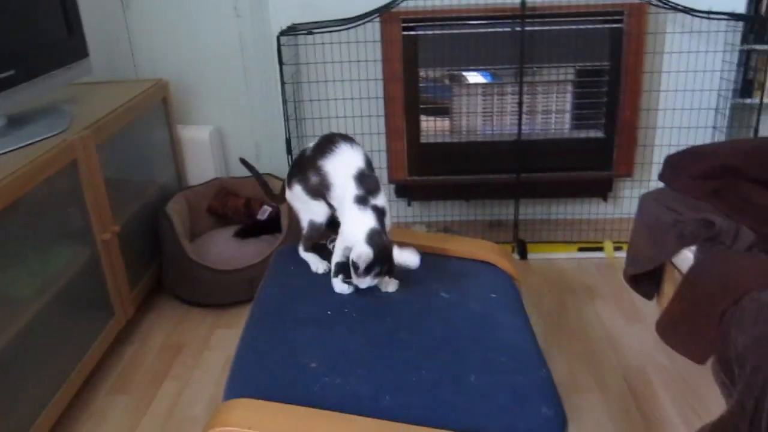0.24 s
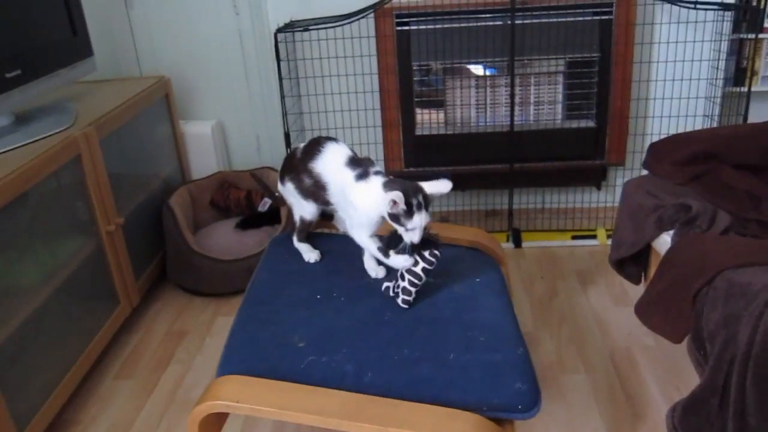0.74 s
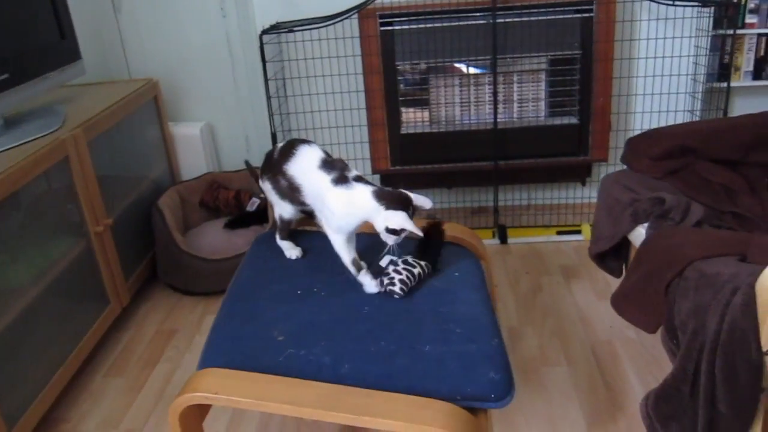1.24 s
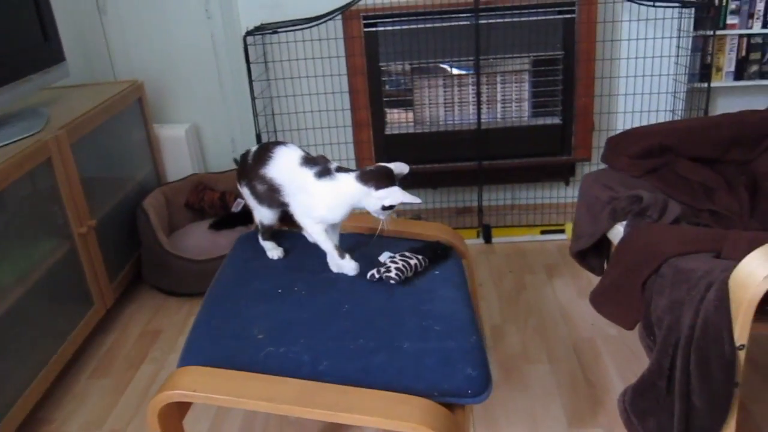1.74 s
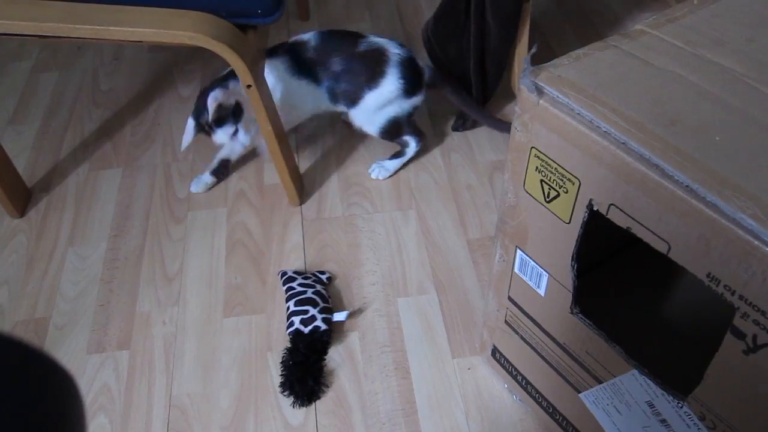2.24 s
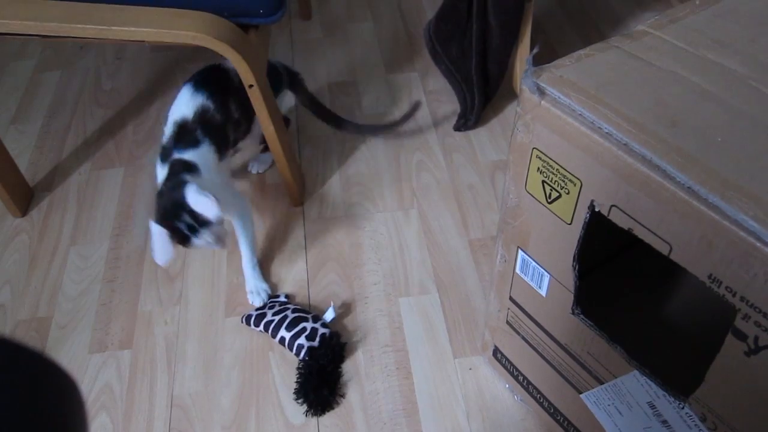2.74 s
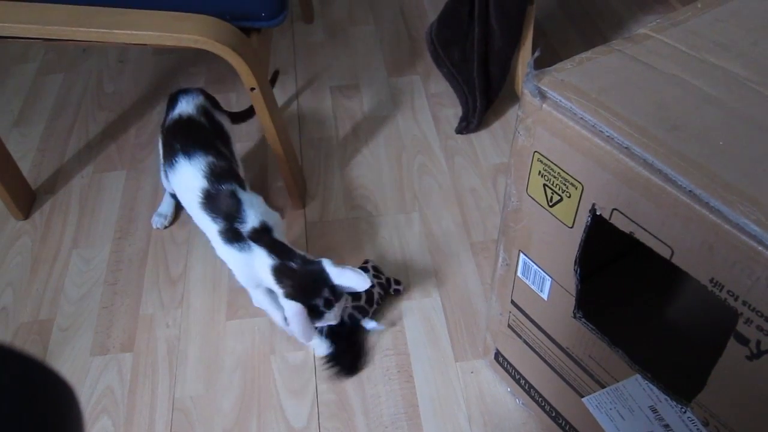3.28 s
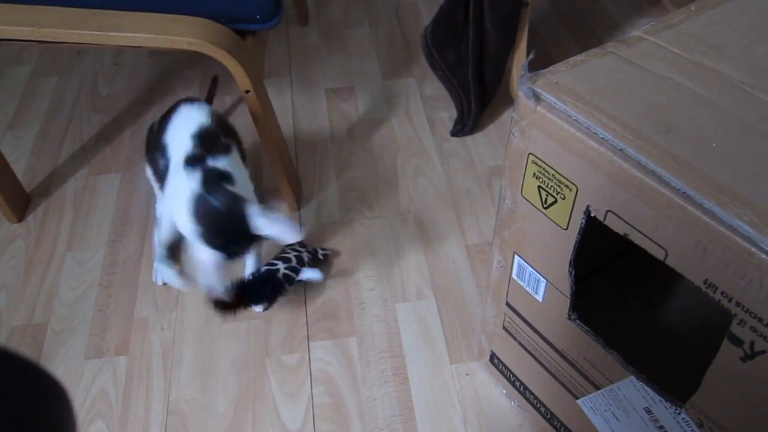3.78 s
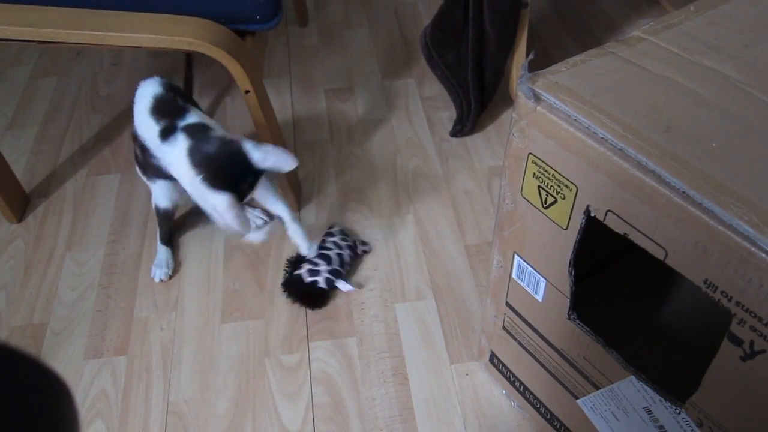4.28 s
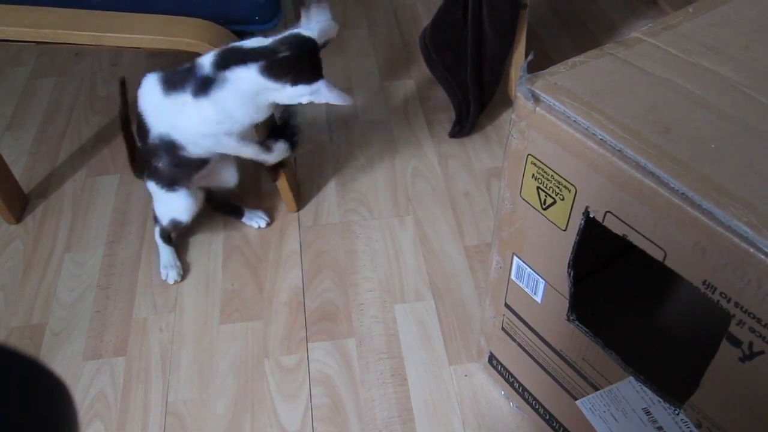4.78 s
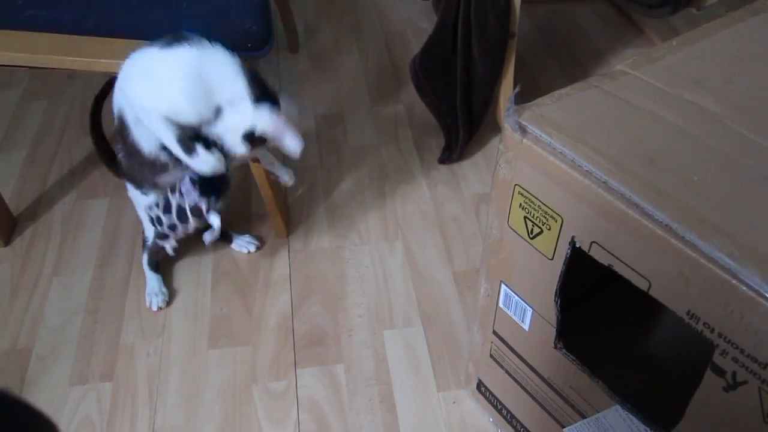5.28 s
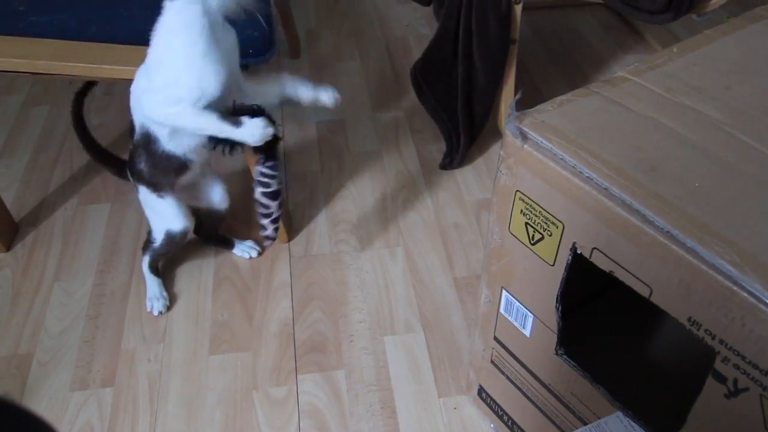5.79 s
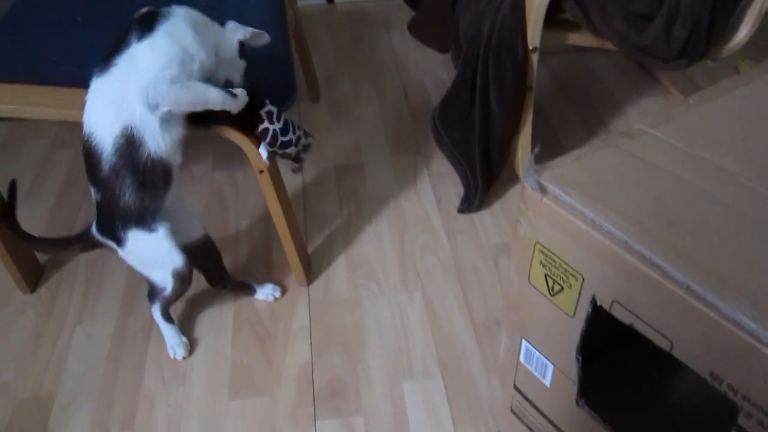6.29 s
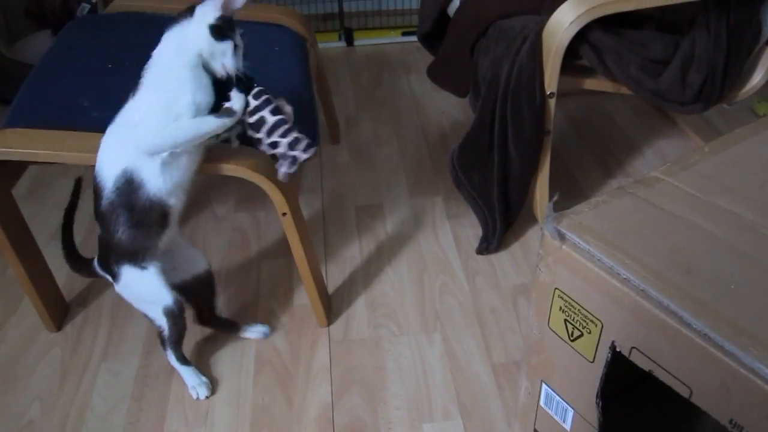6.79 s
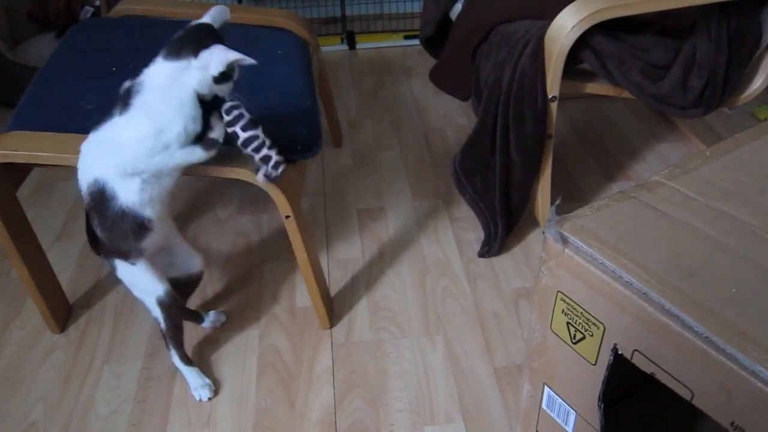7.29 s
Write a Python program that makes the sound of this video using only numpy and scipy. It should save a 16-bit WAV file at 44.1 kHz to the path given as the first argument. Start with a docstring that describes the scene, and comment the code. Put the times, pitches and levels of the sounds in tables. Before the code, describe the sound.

Dry, bright foil crinkles burst and stop as a kitten attacks a soft toy. Quiet rustling, muffled paw thuds and isolated snaps lead to crisp crunches and brief claw rasps, then two loud crumples close together. After near quiet, wooden ticks and renewed crackling end the play. The stereo camera microphone is in a small, lightly reverberant room with soft background hiss and hum.

```python
"""A soft rustle and a thud open the scene: a kitten wrestles a plush toy stuffed with crinkly foil, first on
a padded stool, then on a wooden floor. Foil and plush are noise in four bands, each under its own envelope;
thuds, claw ticks and rasps are decaying resonances; a room answers with noise that dies faster in the treble.
Diffuse room tone, a mains hum and a thin high whine lie under it; the camera cuts a notch in the treble."""
import sys
import numpy as np
from scipy import signal
from scipy.fft import rfft, irfft, next_fast_len
from scipy.io import wavfile
from scipy.ndimage import map_coordinates

SR = 44100
rng = np.random.default_rng(int(sys.argv[2]) if len(sys.argv) > 2 else 0)


def wav_record(signal):
    """Record a signal, one row per channel, as 16-bit PCM in the file named by sys.argv[1]."""
    frames = np.transpose(np.atleast_2d(signal))
    bounded = np.clip(frames, -1, 1)
    # unit amplitude maps onto the largest positive 16-bit level
    quanta = np.round(bounded * 32767).astype(np.int16)
    wavfile.write(sys.argv[1], SR, quanta)


N = 332073
SECONDS = np.arange(N) / SR


def amp(db):
    """Level to amplitude: 20 dB is a factor of ten."""
    return 10 ** (np.asarray(db) / 20)


def unit(x):
    """Normalisation to a root-mean-square value of one."""
    return x / np.sqrt(np.mean(x ** 2) + 1e-20)


def along(points, hz):
    """Linear interpolation of (frequency, value) points on a logarithmic frequency axis."""
    f, v = np.transpose(points)
    return np.interp(np.log(hz + 1), np.log(f + 1), v)


def wobble(rate):
    """Slow random modulation: a smooth spline through random knots, rate knots a second."""
    knots = rng.standard_normal(int(N * rate / SR) + 4)
    return map_coordinates(knots, [np.arange(N) * rate / SR])


def filtered(x, response):
    """Linear filtering: the spectrum of x times a complex response of frequency."""
    m = next_fast_len(N + SR // 2)
    return irfft(rfft(x, m) * response(np.fft.rfftfreq(m, 1 / SR)), m)[..., :N]


def room_tone():
    """Diffuse field: hiss unrelated left and right, plus steady sinusoids mostly in the middle."""
    # spectrum of the hiss, its overall level set below: (frequency [Hz], relative level per Hz [dB])
    tone_spectrum = [(20, -21), (60, -13.5), (150, -10), (600, -11), (1000, -14.5), (3400, -20),
                     (7000, -25.5), (10500, -26.5), (15700, -32.5), (15900, -49)]
    # hum, then whine, before they waver: (frequency [Hz], amplitude [dB])
    steady_tones = [(120, -58.5), (8802, -61)]
    tone_db = -55
    hiss = unit(filtered(rng.standard_normal((2, N)), lambda f: amp(along(tone_spectrum, f))))
    left_right_db = np.array([[.5], [-.5]])
    hiss = hiss * amp(tone_db + 1.04 * wobble(6.9) + left_right_db)
    (hum_hz, hum_db), (whine_hz, whine_db) = steady_tones
    hum = amp(hum_db + 0.87 * wobble(5)) * np.sin(2 * np.pi * hum_hz * SECONDS)
    whine_phase = 1.2 * wobble(30) + np.array([[0], [.7]])  # radians, left and right
    whine = amp(whine_db + 1.8 * wobble(40)) * np.sin(2 * np.pi * whine_hz * SECONDS + whine_phase)
    return hiss + hum + whine


def room(x):
    """Reverberation: each frequency decays exponentially at its own speed, differently at each ear."""
    # decay by 60 dB: (frequency [Hz], time [s])
    decay_times = [(200, 1), (2000, 0.49), (12000, 0.23)]
    # relative strength of the answer: (frequency [Hz], level [dB])
    answer_levels = [(250, -13), (1000, -12), (3000, -9), (12000, -10)]
    hz, t, noise = signal.stft(rng.standard_normal((2, SR // 2)), SR, nperseg=256)
    t60 = along(decay_times, hz)[:, None]
    strength_db = along(answer_levels, hz)[:, None]
    # the root evens out the energy of long and short decays
    decaying = noise * amp(strength_db - 60 * t / t60) / np.sqrt(t60 * SR / 14)
    tail = signal.istft(decaying, SR, nperseg=256)[1]
    delayed = np.pad(x, (60, 0))  # samples
    return signal.fftconvolve(delayed[None], tail, axes=1)[:, :N]


def rung(rows, modes, knock, rise_s):
    """Forced resonance: a first contact and a dying push of noise drive modes tuned to each row's pitch."""
    out, t = np.zeros(N + SR), np.arange(SR // 3) / SR
    for s, db, hz, t60 in rows:
        push = (1 - np.exp(-t / rise_s)) * rng.standard_normal(len(t))
        push[:SR // 2000] = knock  # the first half millisecond
        ring = 0
        for ratio, level, cycles in modes:
            mode_hz = ratio * hz
            ring = ring + amp(level - 60 * t * mode_hz / cycles) * np.sin(2 * np.pi * mode_hz * t)
        ring = ring / np.linalg.norm(ring)
        force = amp(db - 60 * t / t60) * push
        out[round(s * SR):][:len(t)] += signal.fftconvolve(force, ring)[:len(t)]
    return out[:N]


def rasps():
    """Friction noise: dragging claws excite one narrow resonance and sing."""
    # drags of claws: (time [s], drive level [dB], pitch [Hz], decay of the push by 60 dB [s])
    rasp_rows = [(1.135, -49, 2480, 0.38), (2.712, -41, 4460, .2), (2.79, -36.5, 4300, 0.26),
                 (6.8, -43, 1750, 0.25)]
    cycles = 21  # to fall 60 dB
    return rung(rasp_rows, [(1, 0, cycles)], knock=0, rise_s=0.0029)


def ticks():
    """Modal impact: claws and toy on the wooden frame ring briefly, low pitches longer than high ones."""
    # ticks: (time [s], level before onset and modes [dB], pitch [Hz])
    tick_rows = [(.302, -37.5, 2060), (0.808, -42.5, 1750), (2.571, -31, 2820), (3.089, -33.5, 2650),
                 (3.803, -41.5, 1770), (6.202, -13, 2780), (6.219, -27, 1676), (7.081, -25, 1770),
                 (7.279, -18.5, 1687), (7.29, -28, 975), (7.313, -34, 963)]
    # modes of the wood: (ratio to the pitch, level [dB])
    wood_modes = [(0.997, 0.5), (1.35, -5.5), (0.78, -11)]
    cycles, rise_s = 52, 0.00034  # cycles of the pitch to fall 60 dB; time constant of the onset
    out, t = np.zeros(N + SR), np.arange(SR // 10) / SR
    for s, db, hz in tick_rows:
        turns = rng.random(len(wood_modes))  # starting phases
        ring = 0
        for (ratio, level), turn in zip(wood_modes, turns):
            ring = ring + amp(level) * np.sin(2 * np.pi * (ratio * hz * t + turn))
        envelope = amp(db - 60 * t * hz / cycles) * (1 - np.exp(-t / rise_s))
        out[round(s * SR):][:len(t)] += envelope * ring
    return out[:N]


def thuds():
    """Damped resonance: soft blows on stool or boards, kept clear of the deepest bass."""
    # paws and toy landing: (time [s], drive level [dB], pitch [Hz], decay of the push by 60 dB [s])
    thud_rows = [(0.028, -39, 540, 0.3), (.324, -35.5, 516, 0.32), (.891, -44, 596, 0.27),
                 (2.632, -49, 560, 1.4), (2.789, -38, 735, 0.11), (4.872, -35.5, 665, 0.27),
                 (6.078, -41, 620, 0.4), (6.274, -39.5, 328, 0.25), (7.277, -41, 287, 0.16),
                 (7.476, -43.5, 285, 1.1)]
    # modes of stool and boards: (ratio to the pitch, level [dB], cycles to fall 60 dB)
    body_modes = [(1, 0, 5.5), (0.5, -9, 4), (1.7, -4, 7)]
    # knock: first contact over the rubbing that follows
    blows = rung(thud_rows, body_modes, knock=1.17, rise_s=0.0029)
    return filtered(blows, lambda f: (1j * f / (210 + 1j * f)) ** 3)


def crackle(per_s, spread_db, t60, beds):
    """Shot noise: tiny buckles at random moments and sizes over a smooth rub, an envelope per band."""
    hit = rng.random(N) < per_s / SR
    sizes = hit * amp(spread_db * np.minimum(rng.exponential(size=N), 3))
    shape = amp(-60 * np.arange(SR // 100) / SR / t60)
    bursts = unit(signal.fftconvolve(sizes, shape)[:N])
    beds = np.array(beds)[:, None]  # smooth part of each band
    return (beds + bursts) / np.sqrt(beds ** 2 + 1)


def parts(db, low_db, treble_db):
    """Band gains as a column: the 1.2-3.5 kHz band partly follows the low-mid one."""
    middle_db = 0.74 * low_db + 5.5
    return amp(db + np.array([[low_db], [middle_db], [0], [treble_db]]))


def rustle():
    """Friction envelopes: strokes swell, sag and die away over faint fidgeting, uneven and grainy."""
    # paws and teeth rub the toy:
    # (start [s], length [s], drive level [dB], low-mid part [dB], treble part [dB])
    stroke_rows = [(-.012, 0.053, -34.5, -10, -8), (0.338, 0.12, -42, -3.5, 5.5),
                   (0.657, 0.024, -44, 2.5, 8), (1.105, 0.038, -56.5, 7, 10),
                   (1.325, 0.063, -42.5, -1.5, -1), (1.56, 0.029, -45, -9, -7), (2.534, 0.14, -45, -1, -1),
                   (2.701, .07, -43, -2, -25), (2.798, 0.048, -45.5, 0, -18), (3.05, 0.15, -46.5, -2.5, 3),
                   (3.181, 0.03, -47, -1, -3), (3.297, 0.065, -46, -47, -10), (3.615, 0.03, -45, -10, 3),
                   (4.191, 0.05, -44.5, 4.5, -4), (4.273, 0.098, -25, -9.5, -7), (4.817, 0.018, -42, 0, 4),
                   (4.882, 0.055, -18.5, -8.5, -0.5), (6.086, 0.031, -33.5, -2.5, -14),
                   (6.2, 0.15, -40, 0.5, -8), (6.644, 0.048, -45.5, -12, 9.5), (6.736, 0.02, -42.5, -35, 5),
                   (6.784, 0.06, -30, -0.5, 1.5), (6.89, 0.063, -32, -7.5, -2.5),
                   (7.003, 0.016, -25.5, -8, 2), (7.061, 0.03, -22, -7, 2), (7.183, 0.055, -27, -15, -1.5),
                   (7.237, 0.034, -31.5, -7.5, 3), (7.49, 0.05, -43, 7.5, -7)]
    # faint dull rustle of fur and plush between strokes: (time [s], drive level [dB])
    fidget_points = [(0, -56.5), (1.6, -57.5), (2.05, -54.5), (2.12, -63.5), (2.95, -68), (3.4, -55.5),
                     (4.15, -54.5), (4.8, -65), (5.1, -60), (6.05, -60), (6.45, -51), (7.53, -50.5)]
    rise_s, sag_db_per_s, release_db_per_s = 0.013, 20, 229
    fidget_s, fidget_db = np.transpose(fidget_points)
    rub = parts(0, low_db=3, treble_db=0.5) * amp(np.interp(SECONDS, fidget_s, fidget_db))
    for s, length, db, low, treble in stroke_rows:
        t = np.maximum(SECONDS - s, 0)
        fall_db = sag_db_per_s * t + release_db_per_s * np.maximum(t - length, 0)
        swell = np.minimum(t / rise_s, 1) ** 2
        rub = rub + parts(db, low, treble) * (amp(-fall_db) * swell)
    band_wobbles = np.array([wobble(60) for band in rub])
    rub = rub * amp(1.87 * wobble(40) + band_wobbles)
    return rub * crackle(per_s=400, spread_db=5.5, t60=.003, beds=[2.6, 1.7, 1.3, 1])


def crumples():
    """Buckling cascade: a squeeze or blow sets off a crackle that starts at once and decays."""
    # the toy is squeezed or struck:
    # (time [s], drive level [dB], low-mid part [dB], treble part [dB], decay by 60 dB [s])
    crumple_rows = [(0.3217, -33.5, -1, -26, 0.27), (0.554, -40, 4, 10, 0.07),
                    (1.5403, -31.5, -13, -1, 0.094), (2.03, -44, -16, -37, 0.16),
                    (2.525, -17.5, -21, -6, 0.086), (2.702, -30, -50, -20, 0.1),
                    (2.789, -14.5, -14, 4, 0.044), (3.04, -27.5, -7, 1, 0.087), (3.741, -46, 8.5, 7, 0.16),
                    (3.949, -30.5, -0.5, -5, 0.054), (4.1784, -16.5, -4, 2.5, 0.064),
                    (4.2673, -4, -13.5, 0, 0.036), (4.518, -29, -7, -2, 0.18),
                    (4.8724, -5, -15.5, 1, 0.067), (6.099, -27.5, -33, 11, 0.12),
                    (6.191, -21, -12, 2, 0.35), (6.787, -11.5, -13, -4, 0.054),
                    (7.2728, -25.5, 5.5, 0.5, 0.21)]
    rise_s = 0.0028  # time constant of the onset
    out, t = np.zeros((4, N + SR)), np.arange(SR // 3) / SR
    for s, db, low, treble, t60 in crumple_rows:
        decay = amp(-60 * t / max(t60, .005)) * (1 - np.exp(-t / rise_s))
        out[:, round(s * SR):][:, :len(t)] += parts(db, low, treble) * decay
    return out[:, :N] * crackle(per_s=600, spread_db=5, t60=.003, beds=[2.5, 1.6, 1.2, .9])


def snaps():
    """Impulsive buckling: a single fold flips with a sharp onset and a decay of milliseconds."""
    # single folds that snap: (time [s], drive level over the first 5 ms [dB], brightness [dB])
    snap_rows = [(0.3257, -30.5, -3), (0.403, -31.5, 5), (0.4468, -40, 9), (0.493, -34.5, 1),
                 (0.6405, -28.5, 4), (0.6773, -25.5, 8), (0.964, -33.5, 1), (1.111, -37, -3),
                 (1.411, -44, 4), (1.5415, -36, -1), (2.5262, -32, 14.5), (2.5691, -23.5, -2.5),
                 (2.7022, -30, 6), (2.7088, -33.5, 13), (3.0592, -28, 1.5), (3.09, -30, 4),
                 (3.1395, -30, 3), (3.191, -33, 11.5), (3.199, -40, 1), (3.5386, -36.5, 5),
                 (3.5879, -39, 10.5), (3.612, -29.5, 0.5), (3.657, -35, 3), (3.7428, -31, -1.5),
                 (3.823, -34.5, 0.5), (3.9456, -30, 7), (3.9533, -22.5, 9), (4.1797, -25, 7.5),
                 (4.2067, -32, 16.5), (4.2353, -23.5, 0), (4.276, -15, 5.5), (4.292, -26, 8),
                 (4.302, -24, 11), (4.3208, -23.5, 4), (4.333, -21, 1), (4.339, -27, -3),
                 (4.372, -35.5, 11), (4.416, -27.5, 1.5), (4.4853, -35.5, 8), (4.5205, -28, 3),
                 (4.533, -34, 10), (4.544, -18.5, 10), (4.662, -33.5, 5), (5.2464, -35.5, 3),
                 (5.2797, -37, -2), (6.0793, -43.5, -12), (6.0993, -22.5, 2), (6.202, -30.5, 18),
                 (6.35, -31, 6), (6.5394, -37.5, 4), (6.898, -34, 9), (6.903, -38, -15), (6.931, -28, -4),
                 (6.9407, -28, 13), (7.188, -40, 6), (7.194, -37, -0.5), (7.3965, -24.5, 3.5),
                 (7.51, -29.5, 3.5)]
    t60, rise_s = 0.0056, 0.000096  # s; decay by 60 dB and time constant of the onset
    out, t = np.zeros((4, N + SR)), np.arange(SR // 50) / SR
    edge = amp(-60 * t / t60) * (1 - np.exp(-t / rise_s))
    edge = edge / np.sqrt(np.mean(edge[:SR // 200] ** 2))
    for s, db, bright in snap_rows:
        # brightness tilts the four bands, lowest first
        gain = amp(db + np.array([[-14 - 1.2 * bright], [-bright], [0], [bright]]))
        out[:, round(s * SR):][:, :len(t)] += gain * edge
    return out[:, :N]


def foil_colour(envelopes):
    """Subtractive synthesis: four bands of noise, enveloped and shaped by the foil; middle and side."""
    # spectrum of the foil: (frequency [Hz], relative level [dB])
    foil_spectrum = [(50, -77), (200, -9), (400, -8.5), (900, -1.5), (2000, -5), (4500, -3.5), (7000, -4.5),
                     (10500, -2), (13500, -10.5), (15500, -22.5), (16400, -46)]
    # folds lie apart, so left and right differ: (frequency [Hz], side over middle [dB])
    side_levels = [(500, -18), (1500, -10), (3000, -6), (6000, -7), (12000, -11)]

    def below(f, hz):
        return 1 / (1 + (f / hz) ** 6)

    shares = [lambda f: below(f, 1200),
              lambda f: below(f, 3500) - below(f, 1200),
              lambda f: below(f, 8200) - below(f, 3500),
              lambda f: 1 - below(f, 8200)]

    def colour(f):
        return amp(along(foil_spectrum, f) + [0 * f, along(side_levels, f)])

    noise = rng.standard_normal((2, N))
    out = 0
    for envelope, share in zip(envelopes, shares):
        out = out + filtered(envelope * noise, lambda f: colour(f) * share(f))
    return out


def toy():
    """Superposition: rubbing, crumpling and snapping add as envelopes of the same coloured noise."""
    return foil_colour(rustle() + crumples() + snaps())


def scene():
    """Interaural-style time difference: direct sound leads on the left; room answer and tone are added."""
    middle, side = toy()
    middle = middle + thuds() + ticks() + rasps()
    lead_s = 5.5e-6  # the left port is nearer, by twice this
    shift = lambda f: np.exp(2j * np.pi * f * np.array([[1], [-1]]) * lead_s)
    direct = filtered(np.array([middle + side, middle - side]), shift)
    return direct + room(middle) + room_tone()


def record(dry):
    """Band rejection: the camera's notch near 8 kHz, a wide and a narrow stage, then nothing above 16.8 kHz."""
    top_hz = 16800

    def notch(f, stop_hz, wide_hz):
        detuning = 8200 ** 2 - f * f
        return (detuning + 1j * f * stop_hz) / (detuning + 1j * f * wide_hz)

    return filtered(dry, lambda f: notch(f, 220, 2990) * notch(f, 220, 480) * (f < top_hz))


dry = scene()
out = record(dry)
wav_record(out)
```